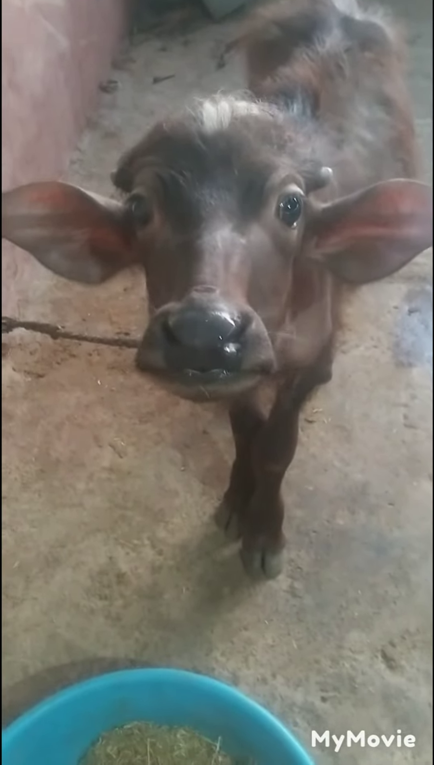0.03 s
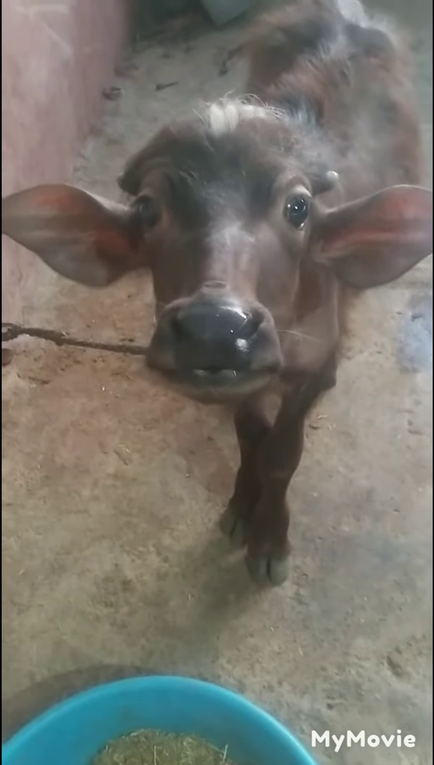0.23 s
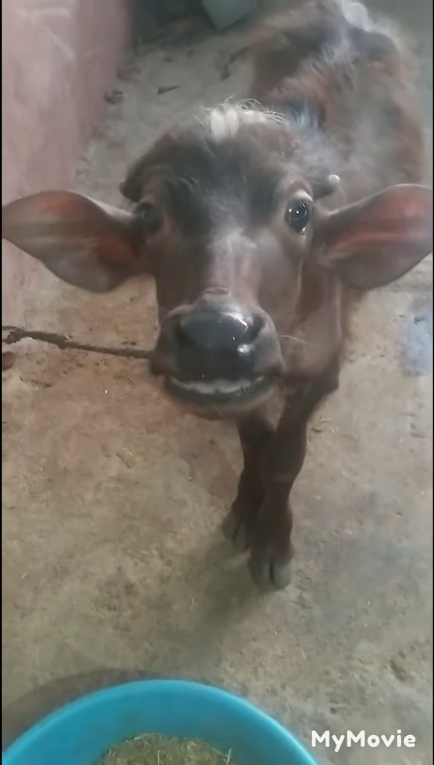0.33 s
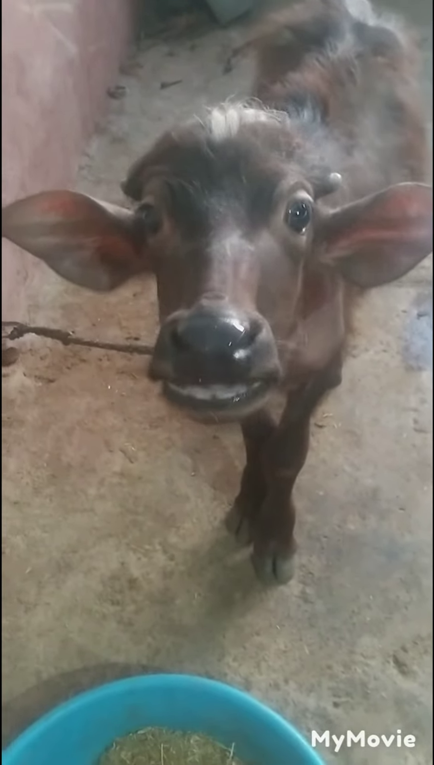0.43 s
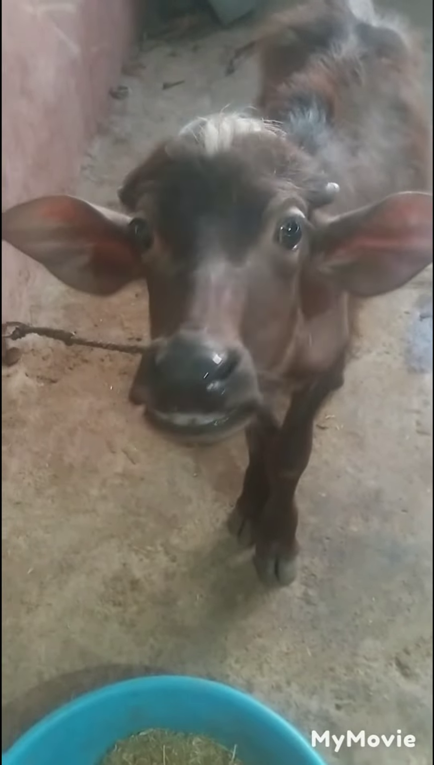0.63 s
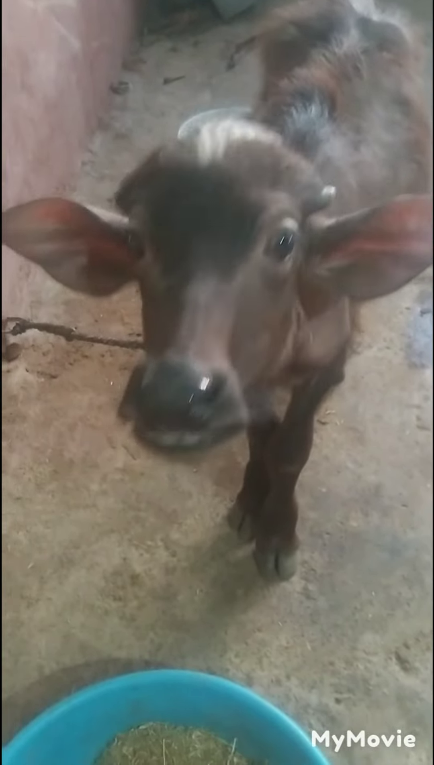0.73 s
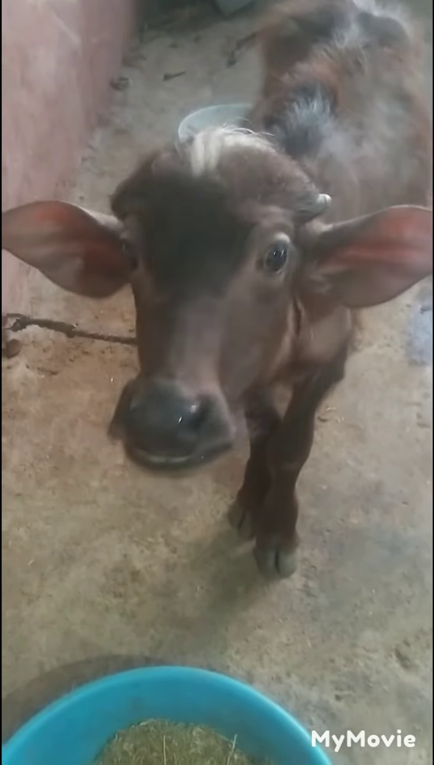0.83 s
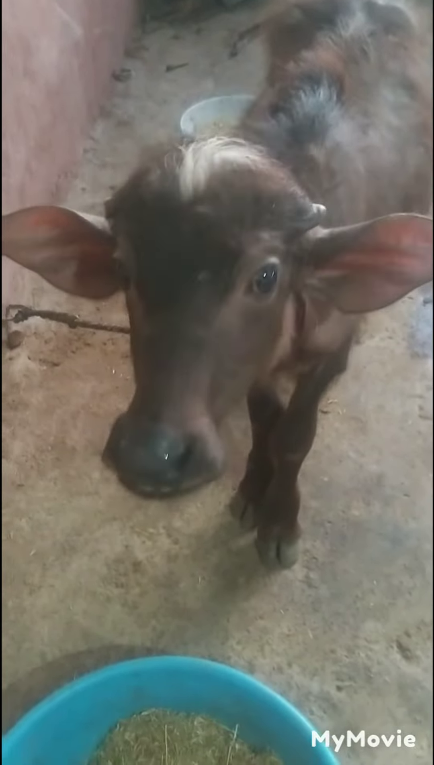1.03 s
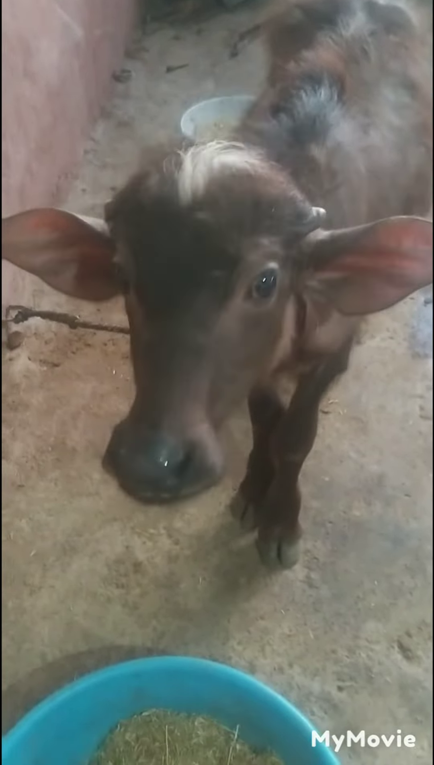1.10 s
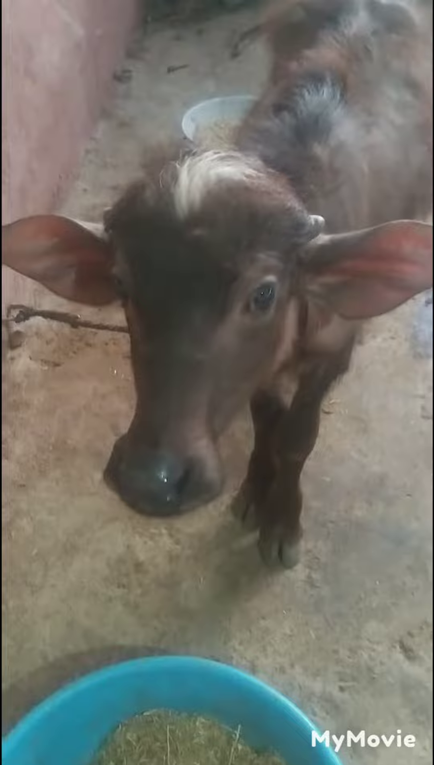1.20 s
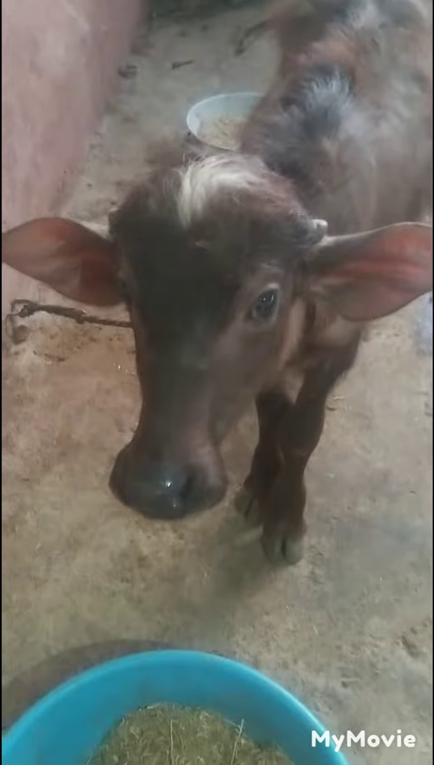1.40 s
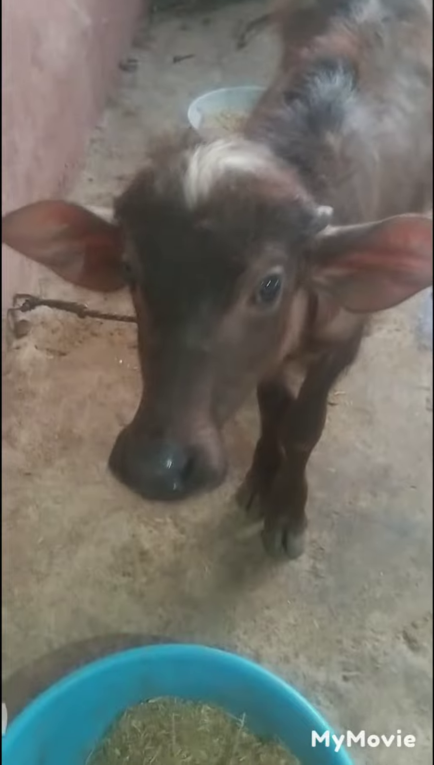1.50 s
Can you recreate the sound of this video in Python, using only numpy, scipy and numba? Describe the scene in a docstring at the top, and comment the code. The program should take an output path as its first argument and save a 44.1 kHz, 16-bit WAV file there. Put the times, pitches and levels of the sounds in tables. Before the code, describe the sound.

One loud, nasal bawl from a nearby buffalo calf, sagging into a creak.

```python
"""A small walled farmyard: a buffalo calf bawls once, close to the microphone.
Vocal-fold pulses ring its throat and nose; the mouth opens, the call overloads the microphone,
then sags into a creak. One soft knock falls in the call, a few follow; ground and wall reflect
both calf and knocks. Behind them: thin distant chirps and the low murmur of the farm."""
import sys
import numpy as np
from scipy import signal
from scipy.fft import rfft, irfft
from scipy.io import wavfile
from scipy.ndimage import uniform_filter1d
from numba import njit

SR = 44100
rng = np.random.default_rng(int(sys.argv[2]) if len(sys.argv) > 2 else 0)


def wav_record(signal):
    """Record a signal, one row per channel, as 16-bit PCM in the file named by sys.argv[1]."""
    frames = np.transpose(np.atleast_2d(signal))
    bounded = np.clip(frames, -1, 1)
    # unit amplitude maps onto the largest positive 16-bit level
    quanta = np.round(bounded * 32767).astype(np.int16)
    wavfile.write(sys.argv[1], SR, quanta)


N = 68355
T = np.arange(N) / SR

# murmur spectrum: f/Hz, relative density/dB
MURMUR_SPECTRUM = [(25, -24), (60, -1.5), (130, -4), (200, 3), (320, -4), (470, -3), (750, -10.5),
                   (1400, -16), (2400, -19), (3800, -23.5), (6500, -33), (7800, -36.5), (10000, -35.5),
                   (15500, -44)]
# murmur envelope: t/s, level/dB
MURMUR_LEVEL = [(0, -43.5), (.6, -45.5), (1.2, -46.5), (1.37, -46.5), (1.43, -49), (1.55, -50.5)]
# chirps: t/s, length/s, start f/Hz, end f/Hz, level/dB
DISTANT_CHIRPS = [(0.029, 0.26, 4900, 5150, -56.5), (1.077, 0.15, 4860, 5050, -60.5),
                  (1.179, 0.125, 5030, 5150, -62.5), (1.425, 0.18, 4750, 4250, -54.5),
                  (1.446, 0.075, 2420, 2400, -61)]
# ground and wall reflections: delay/s, gain/dB
REFLECTIONS = [(.0029, -15), (.0091, -20)]
# knocks: t/s, peak level/dB, ring f/Hz
SOFT_KNOCKS = [(0.666, -26.5, 205), (1.13, -34.5, 700), (1.162, -34.5, 240), (1.302, -36.5, 425),
               (1.305, -33.5, 920)]
# fold pitch in the call and its closing creak: t/s, f/Hz
CALL_PITCH = [(0.15, 138.3), (0.18, 131.4), (0.24, 112.8), (0.272, 111.2), (0.3, 113.7), (0.334, 129.5),
              (0.356, 135.3), (0.444, 139.9), (0.478, 140.5), (0.51, 138.1), (0.548, 134.3), (0.658, 126.4),
              (0.834, 113.6), (0.898, 103.6), (0.95, 90.13)]
CREAK_PITCH = [(1.0, 81), (1.12, 70)]
# fold unsteadiness: t/s, roughness/0-1
ROUGHNESS = [(.15, 0.6), (.27, 0.41), (.315, 0.88), (.345, 0.8), (.385, 0.25), (.55, 0.21), (.72, 0.12),
             (.88, 0.6), (1.0, 0.8)]
# vocal effort: t/s, relative level/dB
CALL_EFFORT = [(.122, -50), (.143, -42), (.15, -28.5), (.2, -25), (.24, -20.5), (.295, -18.5), (.365, -9.8),
               (.53, -10.5), (.64, -15.3), (.73, -19), (.77, -24), (.87, -26.8), (.94, -32), (1.0, -43),
               (1.12, -58)]
# mouth: t/s, posture (0 pursed, 1 nasal, 2 wide open, 3 slack)
MOUTH_POSTURE = [(.15, 0.0), (.235, 1.0), (.29, 1.1), (.37, 1.85), (.5, 2.07), (.6, 2.5), (.7, 2.75),
                 (.8, 3.0)]
# throat and nose resonances per posture: f/Hz, width/Hz, relative gain/dB
NASAL_FORMANTS = [(209, 27, 5), (398, 93, -4.5), (700, 160, -19.5), (940, 70, 1), (1371, 100, 3.5),
                  (1502, 210, -1), (2082, 118, 0.5), (2577, 67, 4), (2967, 84, -5), (3390, 120, -12),
                  (4410, 299, -21), (4960, 110, -14.5), (6360, 200, -14.5), (8950, 560, -24.5),
                  (11400, 1900, -35.5), (13800, 2000, -50)]
OPEN_FORMANTS = [(259, 40, -15.5), (398.7, 27.5, 0), (700, 59, -22), (1040, 35, -20), (1250, 41, -3.5),
                 (1590, 250, -8.5), (2335, 43, 9), (2661, 63.6, 4), (3210, 335, -16.5), (3860, 260, -20),
                 (4730, 480, -25), (5156, 220, -17.5), (6524, 270, -21.5), (9200, 300, -27),
                 (11300, 2000, -45), (13600, 2500, -37)]
SLACK_FORMANTS = [(225.05, 26, -15), (454, 21, 6.5), (780, 150, -30.5), (975, 27, -3.5), (1395, 51.5, 1),
                  (1683, 108, -1.5), (2268, 104, 4), (2803, 152, 4), (3280, 360, -6.5), (3845, 235, -8),
                  (4800, 480, -23), (5740, 80, -19), (6720, 180, -32), (9000, 470, -32.5),
                  (9930, 870, -34.5), (13500, 2000, -63)]
# colour of nearly shut lips: f/Hz, gain/dB
LIP_COLOUR = [(230, -6), (380, 1), (950, -0.5), (1400, -8), (2200, -2), (2560, -1), (2950, 9.5), (4000, -3),
              (9000, 1)]
# fundamental radiated by the body: relative level/dB for nasal, open, slack
CHEST_TONE_DB = [-24, -31, -28]


def undb(db):
    """Decibels to gain."""
    return 10 ** (np.asarray(db) / 20)


def unit(x):
    """Scale to rms 1."""
    return x / np.sqrt(np.mean(x ** 2))


def curve(rows, at=T):
    """Linear interpolation of (x, value) rows."""
    return np.interp(at, *np.array(rows, float).T)


def lowpass(x, hz, order=1):
    """Butterworth treble cut."""
    return signal.sosfilt(signal.butter(order, hz, fs=SR, output="sos"), x)


def wander(hz):
    """Random drift below hz, rms 1."""
    return unit(lowpass(rng.standard_normal(N), hz, order=2))


@njit
def svf(x, hz, width_hz):
    """State-variable band-pass; centre and width per sample."""
    y, band_state, low_state = np.empty(len(x)), 0., 0.
    for i in range(len(x)):
        g, damping = np.tan(np.pi * hz[i] / SR), width_hz[i] / hz[i]
        band = (band_state + g * (x[i] + 1e-18 - low_state)) / (1 + g * (g + damping))
        band_state = 2 * band - band_state
        low_state += 2 * g * band
        y[i] = damping * band
    return y


def ring(x, hz, width_hz):
    """One resonance, gain 1 at its centre."""
    return svf(x, hz * np.ones(N), width_hz * np.ones(N))


def farm(whine_hz=9500, whine_db=-79.5):
    """Low, slightly wavering murmur and a faint high whine."""
    hz, db = np.array(MURMUR_SPECTRUM, float).T
    bins_hz = np.fft.rfftfreq(N, 1 / SR)
    colour = undb(np.interp(np.log(bins_hz + 1), np.log(hz), db))
    murmur = unit(irfft(rfft(rng.standard_normal(N)) * colour, N))
    murmur *= undb(curve(MURMUR_LEVEL) + wander(6.9))
    whine = unit(wander(70) * np.sin(2 * np.pi * whine_hz * T))
    return murmur + undb(whine_db) * whine


def chirps(waver_hz=72, haze_width_hz=1500, haze_db=-2):
    """Thin wavering whistles, blurred by distance."""
    out = np.zeros(N)
    for start_s, length_s, from_hz, to_hz, db in DISTANT_CHIRPS:
        along = np.clip((T - start_s) / length_s, 0, 1)
        hz = from_hz + (to_hz - from_hz) * along
        whistle = unit(wander(waver_hz) * np.sin(2 * np.pi * np.cumsum(hz) / SR))
        haze = ring(rng.standard_normal(N), hz, haze_width_hz)
        haze = unit(ring(haze, hz, haze_width_hz))
        out += undb(db) * np.sin(np.pi * along) * (whistle + undb(haze_db) * haze)
    return out


def yard(x, bright_db=-11.5, boom_db=-13, boom_hz=476):
    """Ground and wall echoes, a short bright tail and a lingering low-mid boom."""
    def tail(noise, t60_s):
        response = noise * np.exp(-np.log(1000) * T / t60_s) * (T > .005)
        return signal.fftconvolve(x, response / np.sqrt(np.sum(response ** 2)))[:N]
    hiss = lowpass(rng.standard_normal(N), 9500)
    bright = tail(hiss - lowpass(hiss, 480), t60_s=.24)
    boom = ring(tail(rng.standard_normal(N), t60_s=1.08), boom_hz, boom_hz / 2)
    echoes = sum(undb(db) * np.interp(T - delay_s, T, x) for delay_s, db in REFLECTIONS)
    return x + undb(bright_db) * bright + undb(boom_db) * boom + echoes


def knocks(thud_decay_s=.0076, tick_decay_s=.0033, tick_hz=1850, tick_db=-13, top_hz=2208):
    """Light knocks: each a dull thud with a brief tick."""
    out = np.zeros(N)
    for start_s, db, hz in SOFT_KNOCKS:
        age_s = np.maximum(T - start_s, 0)
        push = rng.standard_normal(N) * (T >= start_s)
        thud = ring(push * np.exp(-age_s / thud_decay_s), hz, hz / 2)
        tick = ring(push * np.exp(-age_s / tick_decay_s), tick_hz, tick_hz)
        hit = lowpass(thud + undb(tick_db) * tick, top_hz, order=3)
        out += undb(db) * hit / np.abs(hit).max()
    return out


def fold_snap(start_s=.131, peak_db=-24.5, hz=2650, width_hz=400):
    """The folds snap once through the pursed mouth before they vibrate."""
    impulse = signal.unit_impulse(N, int(start_s * SR))
    snap = ring(ring(impulse, hz, width_hz), hz, width_hz)
    return undb(peak_db) * snap / np.abs(snap).max()


def folds(jitter=.013, air_db=-34, rasp_db=-12.5, leak_db=-5.5, leak_hz=9000, top_hz=11000):
    """A pulse and a turbulent puff per cycle, plus leaking air. Returns source, phase/cycles."""
    rough = curve(ROUGHNESS)
    hz = curve(list(CALL_PITCH) + list(CREAK_PITCH)) * (1 + jitter * rough * wander(60))
    phase = np.cumsum(hz) / SR
    from_closure_samples = (phase - np.round(phase)) * SR / hz
    pulses = unit(np.sinc(from_closure_samples) * np.exp(-(from_closure_samples / 5) ** 2))
    puffs = unit(np.exp(-(phase % 1) / .1) * rng.standard_normal(N))
    source = pulses + (undb(air_db) + undb(rasp_db) * rough) * puffs
    leak = undb(leak_db) * rough * unit(ring(rng.standard_normal(N), leak_hz, leak_hz))
    return lowpass(source, top_hz) + leak, phase


def calf(gain_db=-.8, lip_drop=.04, lip_below_hz=1150):
    """Fold pulses ring resonances that glide between postures; effort sets the loudness."""
    source, phase = folds()
    posture = curve(MOUTH_POSTURE)
    pursed = np.clip(1 - posture, 0, 1)

    def blend(values):
        return np.interp(posture, [1, 2, 3], values)
    voice = np.zeros(N)
    for k, shapes in enumerate(zip(NASAL_FORMANTS, OPEN_FORMANTS, SLACK_FORMANTS)):
        hz, width_hz, db = (blend(column) for column in np.array(shapes, float).T)
        db += pursed * curve(LIP_COLOUR, at=hz)
        hz *= 1 - lip_drop * pursed * (hz < lip_below_hz)
        through_nose = k < 2
        polarity = (-1) ** (k + through_nose)  # alternates; the nose inverts it
        voice += polarity * undb(db) * ring(source, hz, width_hz)
    power = uniform_filter1d(uniform_filter1d(voice ** 2, size=1200), size=1200)
    voice /= np.sqrt(power + 1e-12)
    chest = undb(blend(CHEST_TONE_DB)) * np.sin(2 * np.pi * phase)
    calling = (T > CALL_EFFORT[0][0]) & (T < CALL_EFFORT[-1][0])
    return (voice + chest) * undb(gain_db + curve(CALL_EFFORT)) * calling


def scene():
    """Calf and knocks in the yard, over the distant sounds; mono."""
    return (yard(fold_snap() + calf() + knocks()) + chirps() + farm())[None]


def record(dry, ceiling=.74, knee=12, top_hz=15750):
    """Microphone overload flattens the loudest peaks; steep treble cut."""
    clipped = dry / (1 + np.abs(dry / ceiling) ** knee) ** (1 / knee)
    return signal.sosfilt(signal.ellip(10, .2, 80, top_hz, fs=SR, output="sos"), clipped)


dry = scene()
out = record(dry)
wav_record(out)
```